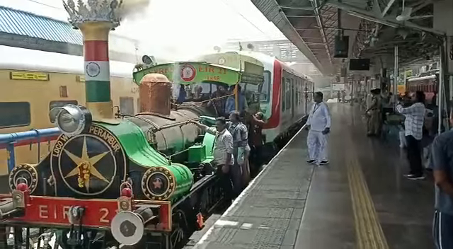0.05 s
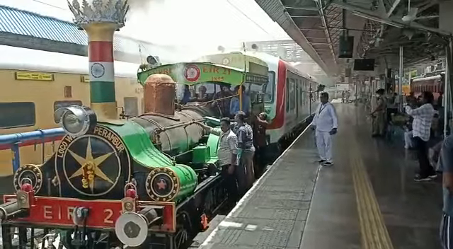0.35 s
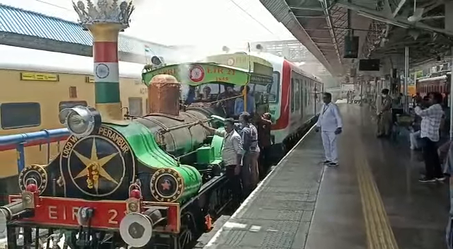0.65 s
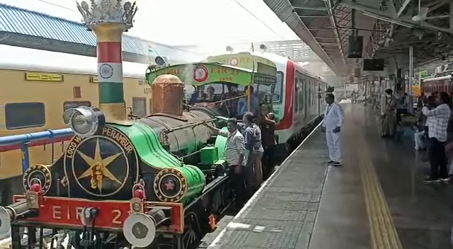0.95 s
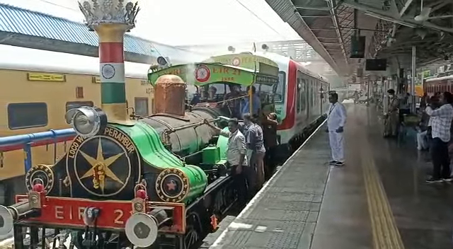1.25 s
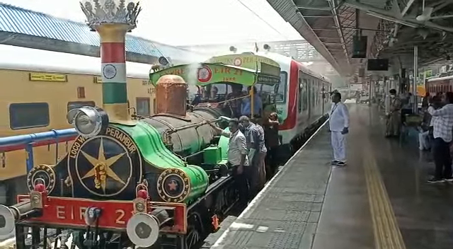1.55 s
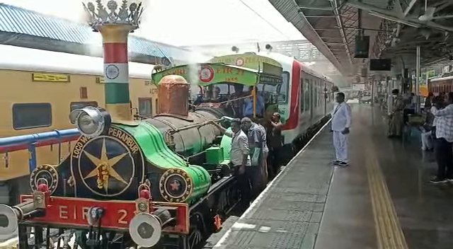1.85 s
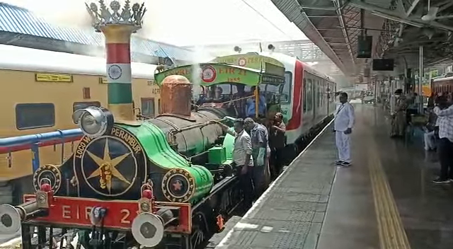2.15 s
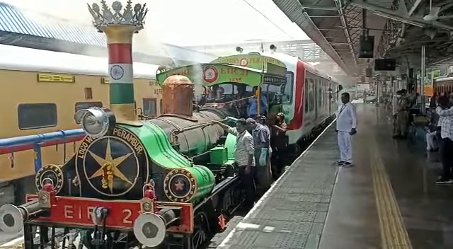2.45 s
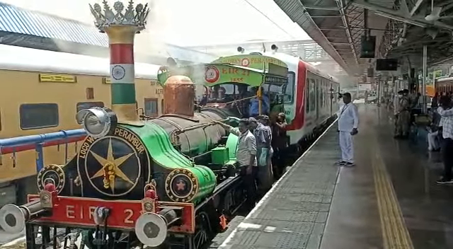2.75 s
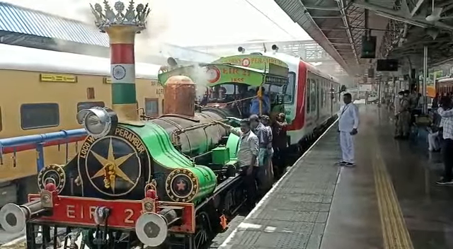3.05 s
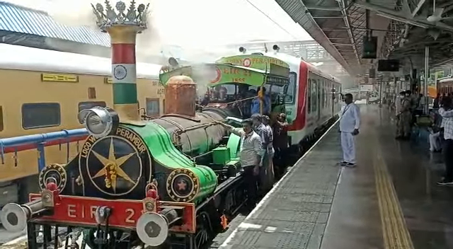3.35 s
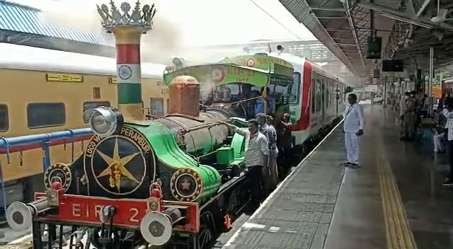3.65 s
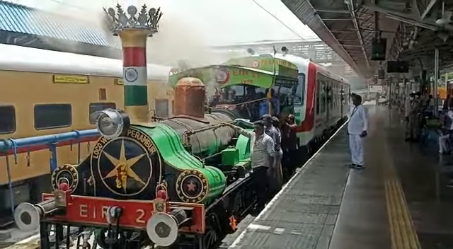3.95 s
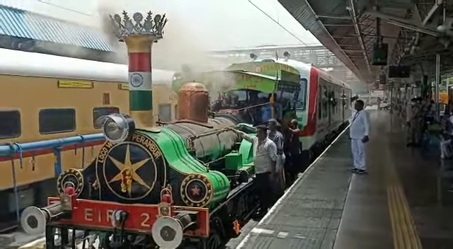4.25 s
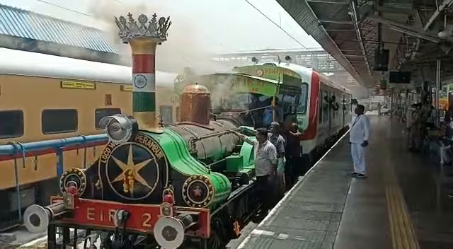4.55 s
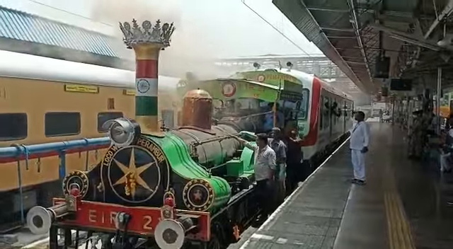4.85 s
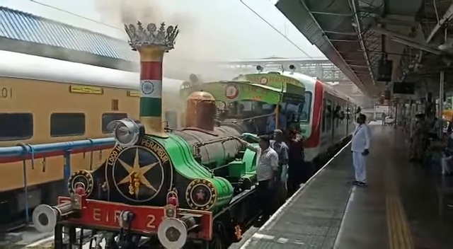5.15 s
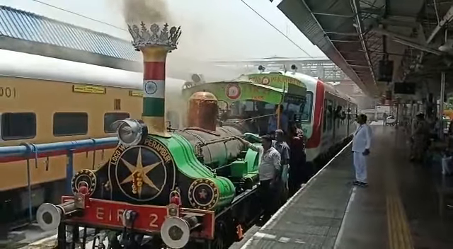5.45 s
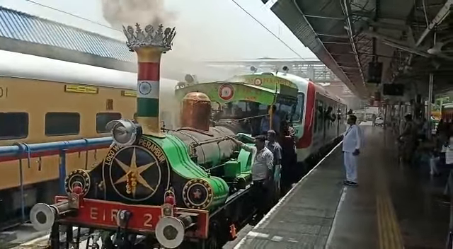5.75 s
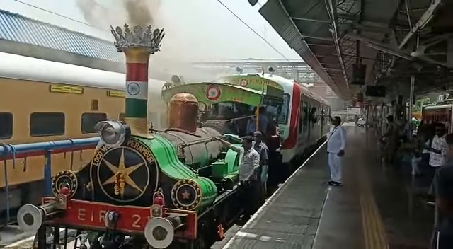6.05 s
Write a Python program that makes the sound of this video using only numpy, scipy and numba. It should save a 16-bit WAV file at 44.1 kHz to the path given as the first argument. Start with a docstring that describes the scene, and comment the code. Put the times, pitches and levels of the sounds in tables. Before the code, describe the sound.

A steam locomotive's whistle is already sounding at the start, one loud, high, almost pure note held at a roofed station platform. A strong jet of steam hisses along with it, over a faint low roar. At about 0.3 seconds there is a very brief, wet, squealing spurt. The note holds nearly the same pitch, fluttering slightly and drifting between left and right. From about 4.4 seconds the whistle shuts off in two goes: the pitch sags and the sound dips, recovers around 4.7 seconds, then sags again with a hoarse, sputtering wheeze and stops at about 4.8 seconds. The station rings briefly with a faint echo. From about 5 seconds to the end at around 6 seconds, a much quieter low hum of an idling diesel comes up, with the steady hiss of leaking steam, which swells slightly near 5.5 seconds.

```python
"""A steam locomotive at a roofed platform holds one long whistle blast: steam drives the bell, and the
jet hisses over a low roar and spurts once early on. A gain control ducks under the blast. From about
4.4 s the valve closes in two goes: the pitch sags, recovers and sags again, with a sputtering wheeze.
The station rings on. The gain comes back up on a diesel hum and the hiss of leaking steam."""
import sys
import numpy as np
from scipy import signal
from scipy.fft import rfft, irfft, next_fast_len
from scipy.io import wavfile
from scipy.ndimage import uniform_filter1d, map_coordinates
from numba import njit

SR = 44100
rng = np.random.default_rng(int(sys.argv[2]) if len(sys.argv) > 2 else 0)


def materialize(psi):
    """Save the field psi as 16-bit PCM at rate SR to the path in sys.argv[1].

    A 1-D psi becomes a single channel; in a 2-D psi each row is a channel.
    """
    bounded = np.clip(np.atleast_2d(psi).T, -1, 1)
    quanta = np.round(bounded * 32767).astype(np.int16)
    wavfile.write(sys.argv[1], SR, quanta)


N = 273772

# Stereo noise. Each row: frequency in Hz, left-right correlation.
EAR_CORRELATION = [(30, .8), (60, 0.93), (130, 0.93), (280, 0.8), (590, 0.61), (1270, 0.057), (2700, 0.029)]
# Noise spectra. Each row: frequency in Hz, relative density in dB.
RUMBLE_SPECTRUM = [(15, -66), (25, -14), (64, -16.5), (86, -10.5), (102, -7), (129, -5.5), (182, -2.5),
                   (248, -5), (368, -10), (659, -5.5), (994, -15.5), (1240, -13), (1350, -15.5),
                   (1500, -10), (1950, -58), (3300, -120)]
LEAK_SPECTRUM = [(710, -58), (1200, -27), (1250, -23), (1310, -12), (1440, -41), (1600, -4), (2860, -3),
                 (3860, -7.5), (5310, -8), (5870, -4.5), (6750, -6), (9480, -26.5), (11200, -14),
                 (13000, -7)]
HISS_SPECTRUM = [(820, -76), (1400, -18.5), (1610, -12.5), (2230, -11), (2360, -7), (2620, -12.5),
                 (3530, -4), (4380, -11.5), (5530, -2), (7250, -5), (8730, -20.5), (9590, -45),
                 (10400, -29.5), (11000, -12.5), (13000, -5.5)]
ROAR_SPECTRUM = [(20, -32.5), (45, -15), (100, -1), (200, 1), (330, -3.5), (650, 1), (950, -3.5),
                 (1800, -54)]
BELL_SPECTRUM = [(600, -120), (900, -18), (1020, -17), (1100, -2.5), (1170, -7), (1230, 4), (1300, -6.5),
                 (1420, -30), (2000, -120)]  # steam noise ringing in the bell
WHEEZE_SPECTRUM = [(700, -66), (930, -20.5), (1030, -10.5), (1110, -4.5), (1170, 1), (1220, -7.5),
                   (1290, -28), (1500, -42), (2150, -37), (2330, -7.5), (2480, -52.5)]  # peaks just under the note
# Diesel hum. Each row: frequency in Hz, relative level in dB.
DIESEL_LINES = [(102.4, -35), (154, -42), (172, -43), (196, -44.5), (225, -42.5), (1476, -49.5)]
# Balance of the steam hiss. Each row: frequency in Hz, left minus right in dB.
STEAM_BALANCE = [(1500, 0), (3000, 3.5), (5000, 3.5), (6500, 14), (8500, 0.5), (10500, 8.5), (12500, 16)]
# Envelopes of steam and whistle harmonics. Each row: time in seconds, relative level in dB.
LEAK_LEVEL = [(5.0, -25), (5.28, -26), (5.51, -22), (5.76, -27.5), (6.2, -26.5)]
JET_ENVELOPE = [(0.5, 0), (1.1, 2.5), (1.6, 0.5), (2.7, -0.5), (3.85, 2), (4.2, 4), (4.37, -1),
                (4.46, -7.5), (4.53, -14.5), (4.59, -6), (4.66, -1), (4.73, -2), (4.79, -9), (4.84, -26.5),
                (4.95, -36.5)]  # outlasts the tone
THIRD_LEVEL = [(0.0, -15), (0.3, -15), (0.72, -14), (0.93, -8.5), (1.14, -7.5), (1.22, -12.5), (1.5, -11),
               (1.8, -9), (1.9, -16.5), (2.0, -14.5), (2.2, -14.5), (2.33, -8.5), (2.4, -17.5),
               (2.9, -16.5), (3.43, -19), (3.62, -4.5), (3.73, -24.5), (3.87, -17), (3.94, -8), (4.03, -14),
               (4.12, -9), (4.24, -13.5), (4.66, -12)]
FOURTH_LEVEL = [(0.6, -27), (2.7, -28), (2.9, -20), (3.25, -22.5), (3.7, -25)]
# Station reverb. Each row: frequency in Hz, time to fall 60 dB in seconds.
STATION_T60 = [(300, 0.99), (1200, 0.85), (2400, 0.74), (5000, 0.35)]
# Far wall echoes. Each row: delay in seconds, gain in dB.
WALL_ECHOES = [(.26, -29), (.42, -38)]
# Wet steam spurt. One pair: centre in seconds, half length in seconds.
SPURT_TIMING = (0.345, 0.026)
# Its squeals. Each row: mid-spurt frequency in Hz, relative level in dB.
SPURT_SQUEALS = [(4850, -13), (5250, -18.5), (6680, -16), (7900, -24)]
# The driver's hand on the whistle valve. Each row: time in seconds, opening from 0 to 1.
VALVE_OPENING = [(4.36, 0.99), (4.44, 0.62), (4.541, 0.2), (4.595, .7), (4.71, .88), (4.765, .55),
                 (4.8, 0.5), (4.84, 0)]
# The note's standing waves at a drifting listener.
# Each row: time in seconds, left minus right in dB, left lead in radians.
STANDING_WAVES = [(0.07, -0.5, 1.34), (0.2, 22, 2), (0.31, 3.5, 0.87), (0.54, 12, 0.75), (0.75, 4, 1.6),
                  (0.83, 18, 2.3), (0.98, 3.5, 4), (1.17, 12, 3), (1.27, -0.5, 1.5), (1.35, 9.5, 3),
                  (1.48, -3.5, 1.22), (1.85, 0, 1.5), (2.23, -8.5, 0.97), (2.34, 7, 1.5), (2.44, -7.5, 0.8),
                  (2.72, -8, 0.3), (3.2, -11, 1), (3.6, -17.5, -1.2), (3.75, -6, -2.5), (3.85, -27, -3.5),
                  (3.96, 6, -2.5), (4.15, -7, -1.54), (4.38, 3, -1.25), (4.48, 3.5, -2.5),
                  (4.66, 2.5, -2.08)]
# Second harmonic. Each row: time in seconds, relative level in dB, left minus right in dB.
OCTAVE_LEVEL = [(0.0, -14, 16), (0.15, -6, 14), (0.42, -13, 0), (0.57, -19.5, -14.5), (0.75, -6, 8),
                (0.84, -15, -8), (1.05, -4, 4.5), (1.22, -10, -9), (1.4, -11, 0), (1.6, -6, 11),
                (1.8, -11, 7), (1.95, -8, 12.5), (2.22, -17.5, 7), (2.6, -8.5, 0.5), (2.85, -10, 5),
                (2.95, -14.5, 14), (3.26, -17, 1), (3.47, -4.5, -1.5), (3.72, -11, 8.5), (3.92, -2.5, -3),
                (4.08, -13.5, 0), (4.2, -11, -2), (4.37, -13.5, 5), (4.66, -13, -2)]


def amp(db):
    """Decibels to gain."""
    return 10 ** (np.asarray(db) / 20)


def unit(x):
    """Scale to rms 1."""
    return x / np.sqrt(np.mean(x ** 2) + 1e-20)


def along(points, hz):
    """Interpolate (Hz, value) points on a log axis."""
    knots_hz, values = np.transpose(points)
    return np.interp(np.log(hz + 1), np.log(knots_hz + 1), values)


def curves(rows):
    """One value per sample for each column after the time."""
    times_s, *columns = np.transpose(rows)
    return [np.interp(np.arange(N) / SR, times_s, column) for column in columns]


def wobble(knots_per_s):
    """Smooth random curve, rms near 1."""
    knots = rng.standard_normal(int(N * knots_per_s / SR) + 4)
    return map_coordinates(knots, [np.arange(N) * knots_per_s / SR])


def filtered(x, response):
    """Apply a gain given as a function of Hz."""
    size = next_fast_len(N + SR // 2)
    return irfft(rfft(x, size) * response(np.fft.rfftfreq(size, 1 / SR)), size)[..., :N]


def pan(side_db):
    """Left and right gains of mean power 1."""
    pair = amp([side_db / 2, -side_db / 2]).reshape(2, -1)
    return pair / np.sqrt(np.mean(pair ** 2, axis=0))


def rush(spectrum, balance=((1000, 0),)):
    """Stereo noise of rms 1, alike in the bass, unrelated in the treble."""
    def mid_side_gains(hz):
        angle = np.arccos(along(EAR_CORRELATION, hz)) / 2
        return amp(along(spectrum, hz)) * [np.cos(angle), np.sin(angle)]
    mid, side = filtered(rng.standard_normal((2, N)), mid_side_gains)
    return unit(filtered(np.array([mid + side, mid - side]), lambda hz: pan(along(balance, hz))))


def patchy(x, depth_db):
    """Each band swells and sinks on its own; rms 1."""
    bands = signal.stft(x, nperseg=1024)[2]
    swells = uniform_filter1d(rng.standard_normal(bands.shape[1:]), size=5, axis=0)
    swells = unit(uniform_filter1d(swells, size=6, axis=1))
    return unit(signal.istft(bands * amp(depth_db * swells), nperseg=1024)[1][:, :N])


def diesel(waver_hz=1.46, throb_db=2.4, lines_db=5, rumble_db=-26):
    """An idling diesel: wavering, throbbing lines over an uneven rumble."""
    lines = 0
    for hz, db in DIESEL_LINES:
        phase = 2 * np.pi * np.cumsum(hz + waver_hz * wobble(24)) / SR
        lines += amp(db + throb_db * wobble(22)) * np.sin(phase)
    rumble = patchy(rush(RUMBLE_SPECTRUM), depth_db=1.4)
    return amp(lines_db) * lines + amp(rumble_db) * rumble


def leak():
    """Steam escapes from the engine throughout, with one slow surge."""
    return amp(curves(LEAK_LEVEL)[0] + 0.23 * wobble(26)) * rush(LEAK_SPECTRUM, STEAM_BALANCE)


def station(x):
    """Reverb from roof and carriages; the treble dies first."""
    hz, t, bands = signal.stft(rng.standard_normal((2, 2 * SR)), SR, nperseg=256)
    decay = amp(-60 * t / along(STATION_T60, hz)[:, None])
    tail = signal.istft(bands * decay, SR, nperseg=256)[1]
    return signal.fftconvolve(x, tail / np.linalg.norm(tail[0]), axes=1)[:, :N]


def far_walls(x):
    """Distinct late echoes from down the platform."""
    return sum(amp(db) * np.pad(x, ((0, 0), (round(delay_s * SR), 0)))[:, :N]
               for delay_s, db in WALL_ECHOES)


def spurt(side_db=4, fall_per_s=1.5, jitter=0.022):
    """A slug of wet steam squeals briefly on a few rough, falling pitches."""
    centre_s, half_s = SPURT_TIMING
    offset_s = np.arange(N) / SR - centre_s
    glide = 1 - fall_per_s * np.clip(offset_s, -2 * half_s, half_s)
    squeals = 0
    for hz, db in SPURT_SQUEALS:
        pitch_hz = hz * glide * (1 + jitter * wobble(600))
        squeals += amp(db) * np.sin(2 * np.pi * np.cumsum(pitch_hz) / SR)
    return pan(side_db) * np.exp(-(offset_s / half_s) ** 2) * squeals


def jet(hiss_db=-6, roar_db=-33, unevenness_db=3, reverb_db=-7):
    """The steam that blows the whistle hisses and spurts once, over a low, unevenly pulsing roar."""
    hiss = amp(hiss_db + 0.19 * wobble(5.31)) * rush(HISS_SPECTRUM, STEAM_BALANCE)
    roar = amp(roar_db + unevenness_db * wobble(9.2)) * patchy(rush(ROAR_SPECTRUM), unevenness_db)
    steam = amp(curves(JET_ENVELOPE)[0]) * (hiss + roar) + spurt()
    return steam + amp(reverb_db) * station(steam)


def reflections(phase, changes_per_s):
    """Copies of a partial, shifting at random in strength and phase at each ear."""
    ears = lambda: np.array([wobble(changes_per_s), wobble(changes_per_s)])
    return (ears() * np.sin(phase) + ears() * np.cos(phase)) / np.sqrt(2)


def overtone(phase, side_db=5.5, flicker_db=3, reflected_share=0.066, left_lead_rad=0.8):
    """A partial plus its reflections; it flickers as it crosses the steam cloud."""
    direct = np.sqrt(1 - reflected_share) * np.sin([phase + left_lead_rad / 2, phase - left_lead_rad / 2])
    flicker = amp(flicker_db * np.array([wobble(45), wobble(45)]))
    reflected = np.sqrt(reflected_share) * reflections(phase, changes_per_s=9)
    return pan(side_db) * flicker * (direct + reflected)


def bell_overtones(phase, fifth_db=-26.5):
    """Harmonics 2 to 5; the octave wanders between the ears, the rest sit left."""
    octave_db, octave_side_db = curves(OCTAVE_LEVEL)
    upper = amp(octave_db) * overtone(2 * phase, octave_side_db)
    for order, db in [(3, curves(THIRD_LEVEL)[0]), (4, curves(FOURTH_LEVEL)[0]), (5, fifth_db)]:
        upper += amp(db) * overtone(order * phase)
    return upper


def wheeze(valve, level_db=-5, onset_opening=0.884):
    """Airy noise of the underblown bell, strongest near half open."""
    underblown = np.sqrt(np.clip(1 - valve / onset_opening, 0, 1))
    return amp(level_db) * valve * underblown * rush(WHEEZE_SPECTRUM)


def bell_phase(valve, sputter, start_hz=1205.3, sag_hz=44.84, sputter_hz=220.8, sink_hz_per_s=1.4):
    """Pitch sinks as the boiler draws down, sags as the valve closes and drops in sputters."""
    pitch_hz = start_hz - sink_hz_per_s * np.arange(N) / SR - sag_hz * (1 - valve) - sputter_hz * sputter
    turbulence = 1 + 0.0018 * wobble(140)
    return 2 * np.pi * np.cumsum(pitch_hz * turbulence) / SR


def bell_note(phase, level_db=9, shimmer_db=-15.5):
    """The fundamental in standing waves; in their nulls, reflections through moving steam flutter."""
    side_db, lead_rad = curves(STANDING_WAVES)
    standing = pan(side_db) * np.sin([phase + lead_rad / 2, phase - lead_rad / 2])
    return amp(level_db) * (standing + amp(shimmer_db) * reflections(phase, changes_per_s=32))


def whistle(sputter_opening=0.72, flutter_db=0.5, hoarse_db=4, sputter_loss_db=1.5,
            bell_noise_db=-12, reverb_db=-10.5, echo_rise_s=0.5):
    """Steam drives the bell to a nearly pure tone; underblown, it goes flat, sputters and wheezes."""
    valve = np.clip(curves(VALVE_OPENING)[0], 1e-3, 1)
    underblown = np.sqrt(np.clip(1 - valve / sputter_opening, 0, 1))
    sputter = underblown * np.tanh(0.5 * wobble(130) ** 2)
    phase = bell_phase(valve, sputter)
    waver_db = flutter_db * wobble(24.93) + hoarse_db * underblown * wobble(90)
    drive = valve ** 3.12 * amp(waver_db - sputter_loss_db * sputter)
    note = bell_note(phase)
    upper = bell_overtones(phase)
    tone = drive * (note + upper) + wheeze(valve)
    # Echoes of a held note merge into standing waves; those of a dying note are heard apart.
    closing_s = VALVE_OPENING[0][0]
    ending = tone * np.clip(1 + (np.arange(N) / SR - closing_s) / echo_rise_s, 0, 1)
    diffuse = ending + drive * (amp(bell_noise_db) * rush(BELL_SPECTRUM) + upper)
    return tone + amp(reverb_db) * station(diffuse) + far_walls(ending)


def scene(blast_db=5):
    """Whistle and jet over leaking steam and diesel hum."""
    return amp(blast_db) * (whistle() + jet()) + leak() + diesel()


@njit
def peak_envelope(level, fall_per_sample):
    """Jumps to each peak, then decays."""
    held = level.copy()
    for i in range(1, len(held)):
        held[i] = max(held[i], held[i - 1] * fall_per_sample)
    return held


def record(dry, ceiling_db=-5, release_s=0.072, side_weight_db=6, top_hz=13150):
    """Fast linked gain control, ducking more when the channels are out of phase; then a low-pass."""
    mid, side = (dry[0] + dry[1]) / 2, (dry[0] - dry[1]) / 2
    power = uniform_filter1d(mid ** 2 + (amp(side_weight_db) * side) ** 2, size=300)
    level = np.sqrt(2 * np.abs(power)) + 1e-9
    envelope = peak_envelope(level, np.exp(-1 / (release_s * SR)))
    gain = uniform_filter1d(np.minimum(1, amp(ceiling_db) / envelope), size=800)
    return filtered(dry * gain, lambda hz: hz < top_hz)


dry = scene()
out = record(dry)
materialize(out)
```